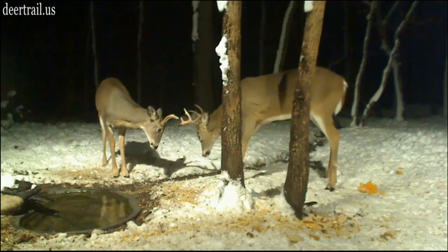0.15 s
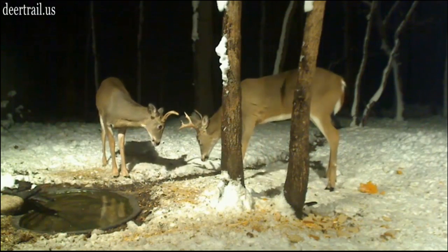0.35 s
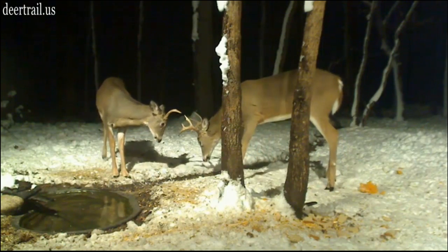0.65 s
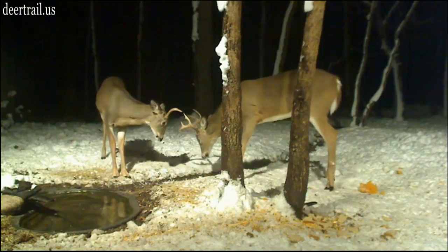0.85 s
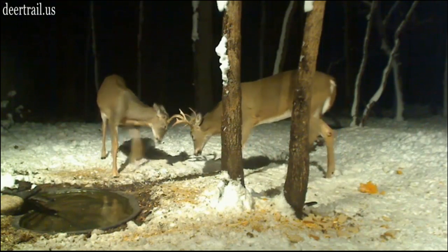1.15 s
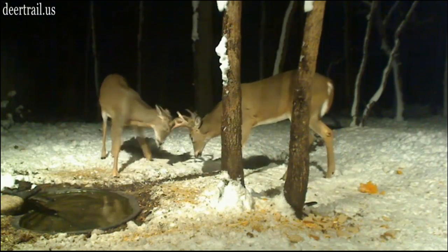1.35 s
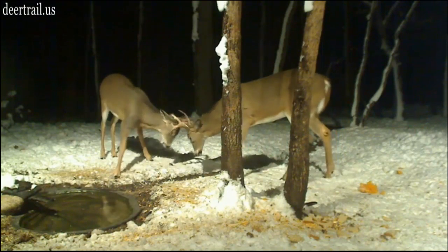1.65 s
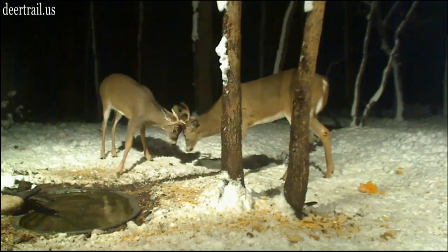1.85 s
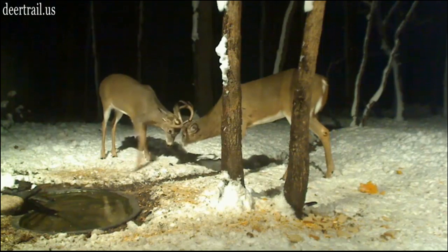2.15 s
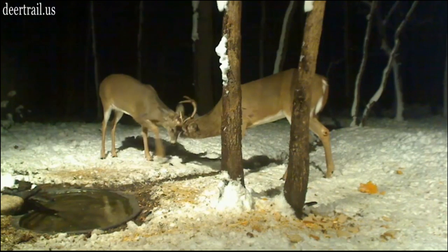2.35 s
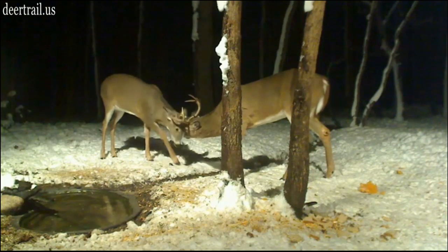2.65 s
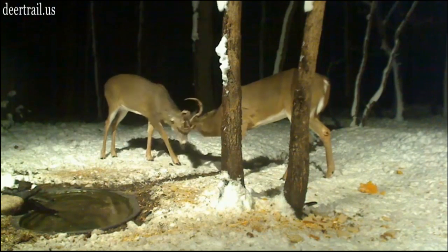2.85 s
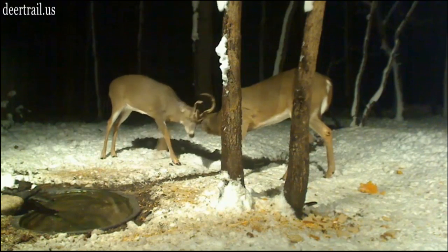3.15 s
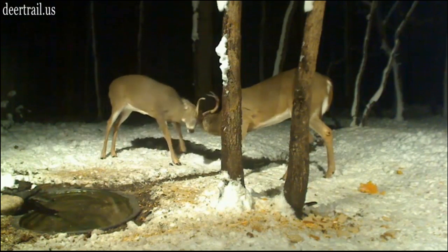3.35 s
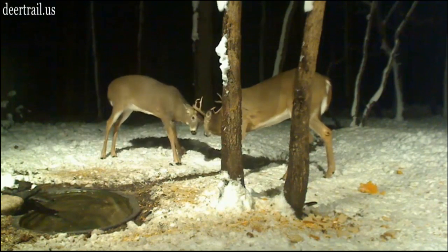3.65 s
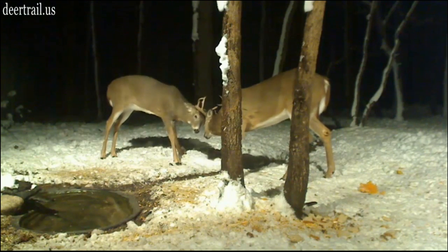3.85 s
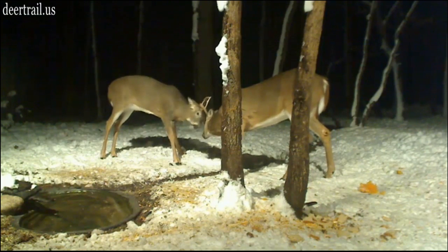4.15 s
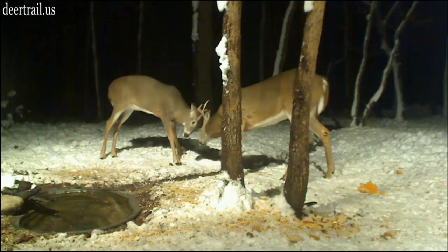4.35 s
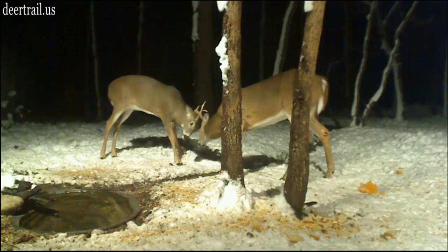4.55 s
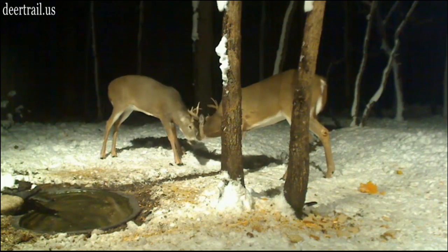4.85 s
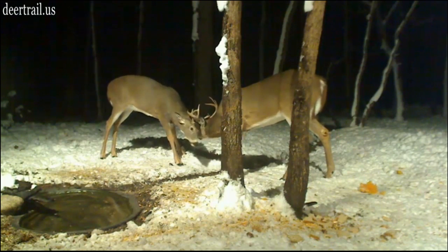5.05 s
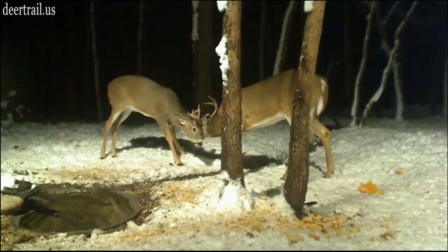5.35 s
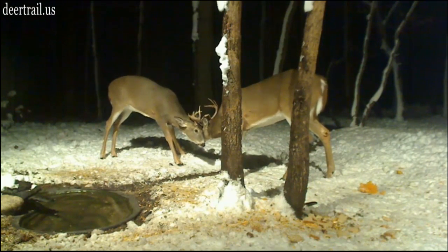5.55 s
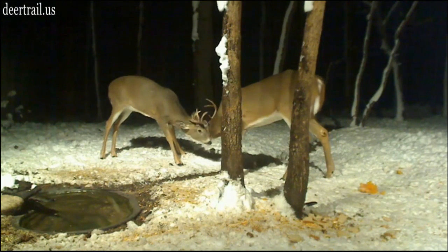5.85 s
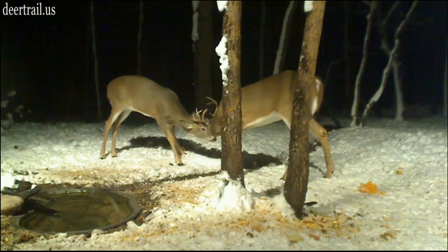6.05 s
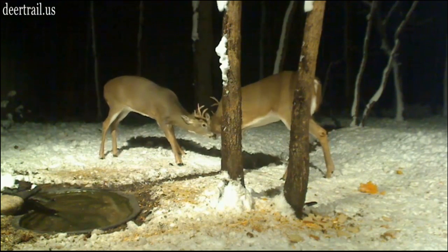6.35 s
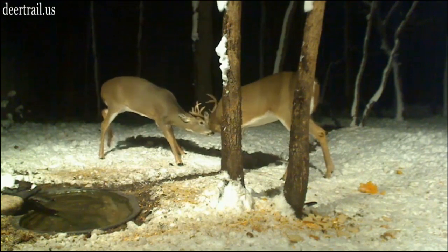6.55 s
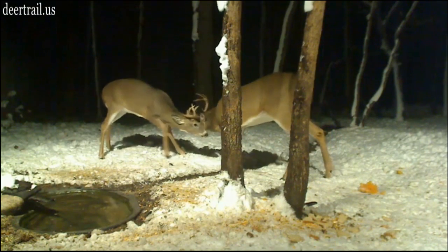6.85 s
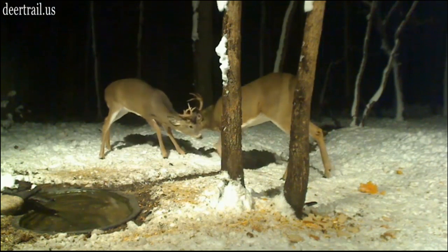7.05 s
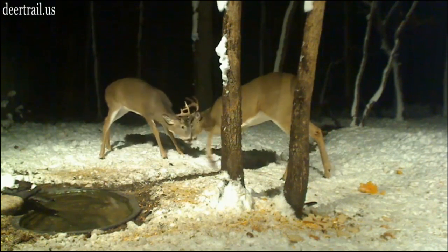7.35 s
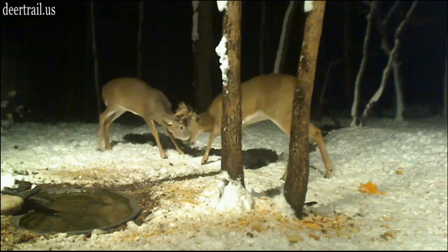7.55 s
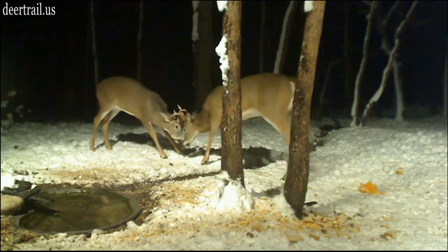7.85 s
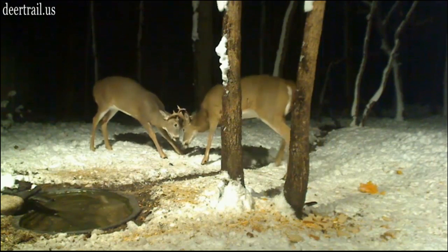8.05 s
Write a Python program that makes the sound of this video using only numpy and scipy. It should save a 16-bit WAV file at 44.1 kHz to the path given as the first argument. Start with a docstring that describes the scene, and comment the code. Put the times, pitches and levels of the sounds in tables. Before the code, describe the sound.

Two deer spar at a snowy woodland edge at night, heard from a few metres away. Small antler clicks and scrapes come early with soft powdery hoof rustles, then isolated hard clacks near the middle, a long near-quiet gap, and the loudest crack close to the end. Trees return a short, thin echo. A dull distant wash and faint low machine hum lie beneath.

```python
"""Two bucks spar on crusted snow at night, heard from some metres away at the edge of a wood.
Their antlers clack and grind as dying modes of skulls, beams and tines, struck by blows or runs of tiny slips.
Hooves thud as short sine pushes; snow sweeps and soft bursts of hiss are streams of tiny coloured clicks.
The wood adds a few echoes, a short dense scatter and a thin noise tail. Under it lie a dull distant wash of
shaped noise and the low hum of a far machine, made of two wavering tones."""
import sys
import numpy as np
from scipy import signal
from scipy.fft import rfft, irfft, next_fast_len
from scipy.io import wavfile
from scipy.ndimage import uniform_filter1d

SR = 44100
rng = np.random.default_rng(int(sys.argv[2]) if len(sys.argv) > 2 else 0)


def wrap_up_sound(samples):
    """Save the sound to the file named by the first command line argument, as 16-bit audio."""
    columns = np.atleast_2d(samples).T
    # keep every value between -1 and 1, then stretch to whole-number steps
    tamed = np.clip(columns, -1, 1)
    steps = np.round(tamed * 32767).astype(np.int16)
    wavfile.write(sys.argv[1], SR, steps)


N = 362061
TIME = np.arange(N) / SR  # s
RING = np.arange(6000) / SR  # time within one short sound, s

# Colour of the night air: freq_hz, level_db_per_hz
AIR_SPECTRUM = [(20, -8.5), (50, -5), (75, -2), (110, 2), (170, -7), (330, -4), (480, -4.5), (610, -1),
                (780, -5.5), (1050, -6), (1600, -21), (3000, -24), (7000, -29.5), (10000, -34)]
# Level of the distant wash: time_s, level_db
WASH_LEVEL = [(0, -58), (7.5, -58), (7.95, -54.5), (8.21, -56.5)]
# Soft bursts of bright hiss, most of them hooves sweeping through snow:
# start_s, length_s, level_db, icy_share (0 powder to 1 crust)
HISS_BURSTS = [(0, 0.037, -64, .4), (.411, 0.042, -63, .2), (.52, 0.37, -72.5, 0.22),
               (1.011, 0.14, -64.5, .15), (1.336, .15, -62, .25), (1.572, .026, -59, 0.12),
               (1.632, 0.022, -62, 0.2), (2.143, 0.12, -60, 0.76), (2.337, 0.13, -66.5, 0.73),
               (2.853, 0.017, -65.5, 0.6), (3.632, 0.036, -62, .6), (4.38, .1, -70, 0.2),
               (6.878, 0.15, -68, 0.7), (7.116, .053, -65, 0.55), (7.614, 0.045, -63, 0.9),
               (7.687, 0.036, -62, 0.7)]
# Colour of powder snow: freq_hz, level_db_per_hz
POWDER_SPECTRUM = [(300, -6), (1400, 3), (3000, -3.5), (4300, 2.5), (6000, -1.5), (7200, -9.5), (8100, -7),
                   (10300, -15)]
# Colour of icy crust: freq_hz, level_db_per_hz
CRUST_SPECTRUM = [(300, -16), (1500, -12), (3000, -8), (4300, 0.5), (6300, 0), (7200, 10.5), (8100, 0.5),
                  (9700, 5.5), (10600, -5)]
# Antlers grinding on each other: start_s, end_s, level_db
ANTLER_GRINDS = [(.56, .76, -60), (.828, .86, -51.5), (1.08, 1.1, -45), (1.11, 1.132, -47),
                 (1.412, 1.48, -49), (2.67, 2.745, -61), (3.08, 3.21, -57), (3.65, 3.705, -50.5),
                 (4.422, 4.47, -46.5), (6.942, 6.975, -51.5), (7.83, 7.90, -49.5)]
# Modes of each buck's head, skull to beams to tines, at pitch and length factors of 1:
# freq_hz, level_db, t60_s
LIGHT_RACK_MODES = [(135, 0, 0.079), (264, -10, 0.071), (339.4, 5, 0.04), (402.6, -18, 0.079),
                    (663, -9, 0.089), (1027, -7.5, 0.13), (1245, 6, 0.039), (1350, -7, 0.028),
                    (1807, -12, 0.064), (1984, -4, 0.027), (2597, -9.5, 0.041), (3000, -16, 0.011),
                    (3340, -12, 0.017), (3403, -9.5, 0.032), (3850, -7.5, 0.023), (4195, -2.5, 0.017),
                    (4890, -5.5, 0.018), (5690, -5.5, 0.01), (5884, -4.5, 0.019), (6270, -2.5, 0.018),
                    (6410, -5, 0.015), (6820, -3.5, 0.014), (7420, -7, 0.015)]
HEAVY_RACK_MODES = [(76, -19, 0.045), (154, -13, 0.027), (242, -13, 0.028), (337, -1, 0.035),
                    (399, -2.5, 0.051), (944, -10.5, 0.029), (1130, -13.5, 0.016), (1328, 3, 0.034),
                    (2160, -7, 0.033), (2507, -11.5, 0.04), (3180, -15, 0.035), (4310, -16, 0.027),
                    (4356, -15, 0.053), (4492, 1.5, 0.022), (4720, -6.5, 0.018), (5400, -17, 0.012),
                    (5700, -9, 0.016), (6880, -1, .01), (7230, -2, 0.015), (7460, -4.5, 0.014)]
# Hoof falls: start_s, peak_db (of the envelope), pitch_hz
HOOF_FALLS = [(.819, -37, 336), (1.0664, -32, 300), (1.684, -30.5, 415), (3.128, -43, 335),
              (3.658, -31, 175), (5.627, -42.5, 334), (5.844, -45.5, 340), (6.072, -43.5, 350),
              (6.4812, -26.5, 407), (7.092, -41.5, 265), (7.98, -44.5, 274)]
# Antler blows: start_s, force_db, contact_place (0 base to 1 tine tip), pitch_factor, heavy_share (0 to 1)
ANTLER_BLOWS = [(.82, -51, .37, 0.83, .7), (1.065, -53, .3, 1.02, .2), (1.1039, -42, .05, 0.85, .3),
                (1.137, -43, .42, 0.86, 0.09), (1.278, -48.5, 0.86, 0.96, 0.4),
                (1.3909, -44, 0.74, 0.91, 0.4), (1.403, -41.5, 0.95, 0.94, 0.1),
                (2.549, -45, 0.49, 1.01, 0.46), (3.155, -51.5, .17, 0.99, 0.04),
                (3.1852, -47, .08, .89, 0.4), (3.6002, -57.5, .85, 1.02, 0.25),
                (3.648, -40.5, .45, 0.79, 0.2), (3.657, -40.5, 0.5, .92, 0.96),
                (3.6648, -29.5, .35, .91, .6), (3.685, -43.5, .1, 1, .4), (3.695, -48, 0.76, .68, 0),
                (4.4024, -43.5, 0.44, .96, 0), (4.4404, -40, 0.48, 0.93, 0.08),
                (4.711, -49.5, .18, 1.07, 0.9), (5.101, -27, 0.92, 1, 0.08), (6.8883, -58.5, 0.36, 1.1, .8),
                (6.938, -49.5, .05, 0.83, 0), (6.996, -48.5, .43, 0.9, 0.5),
                (7.6363, -40.5, 0.4, .81, 0.43), (7.818, -21.5, 0.62, .99, 0.97),
                (7.861, -40, 1, 0.98, .77), (7.875, -36, 0.74, 0.91, 0.96), (7.914, -46.5, .3, 0.77, 0.3)]
# Splintery noise of a contact: freq_hz, level_db_per_hz
SPLINTER_SPECTRUM = [(300, -21), (1500, -3), (2400, -3.5), (3200, -0.5), (3700, -5), (4200, -13),
                     (5200, -2), (7400, -12.5), (7900, -15), (9200, -9), (10000, -44)]
# Discrete echoes off nearby trunks: delay_s, level_db
TRUNK_ECHOES = [(.0053, -17), (0.014, -17.5), (0.0165, -42), (0.0236, -20.5)]
# How much of each band the wood scatters back: freq_hz, level_db
SCATTER_SPECTRUM = [(150, 5), (400, -9.5), (1300, -2.5), (2200, 1.5), (4500, -1.5), (7200, -3), (8500, 1.5)]
# Dying time of the wood's tail: freq_hz, t60_s
WOODS_DECAY = [(200, 0.11), (1300, 0.37), (3500, 0.52), (7000, 0.45), (10000, 0.28)]

LOW_HUM_HZ, LOW_HUM_DB = 90.1, -66.5
HIGH_HUM_HZ, HIGH_HUM_DB, HUM_RISE_DB_PER_S = 134.3, -71.5, 1.24  # the upper tone slowly grows
THROB_DB, THROB_PERIOD_S, THROB_PEAK_S = 3.5, 1.837, 6.69  # swing either way, period, time of one peak
BURST_EDGE_S = 0.011  # each burst fades in and out this quickly
SETTLE_DB, SETTLE_S = -11.5, 0.088  # the patter after a burst: level against it, decay time constant
FIRM_DB = -39.5  # the force of an ordinary firm blow
THUMP_DB, THUMP_GROWTH = -41, 0.78  # skulls of a light rack under a firm blow; dB more per dB of force
HEAVY_THUMP_DB = -3.5  # the heavy head gives way less
BASE_CRACK_DB, TIP_CRACK_DB = -24, 5.5  # crack against beams, for a blow at the base and at the tip
EDGE_HZ = 10380  # upper band limit


def amp(db):
    """Turns decibels into gain."""
    return 10 ** (np.asarray(db) / 20)


def evened(x):
    """Scales to rms 1."""
    return x / np.sqrt(np.mean(x ** 2) + 1e-20)


def crested(x):
    """Scales so that the loudest two milliseconds have rms 1."""
    power = uniform_filter1d(x ** 2, size=88, mode="constant")
    return x / np.sqrt(power.max() + 1e-20)


def read(points, hz):
    """Reads a spectrum table on a log-frequency axis."""
    f, value = np.transpose(points)
    return np.interp(np.log(hz + 1), np.log(f + 1), value)


def curve(rows):
    """Draws a curve table at every sample."""
    return np.interp(TIME, *np.transpose(rows))


def coloured(x, points):
    """Filters x with the gains of a spectrum table."""
    size = next_fast_len(len(x) + 512)
    gain = amp(read(points, np.fft.rfftfreq(size, 1 / SR)))
    return irfft(rfft(x, size) * gain, size)[:len(x)]


def add(mix, s, sound):
    """Mixes a sound in at time s."""
    part = mix[max(round(s * SR), 0):][:len(sound)]
    part += sound[:len(part)]


def strokes(rows, edge):
    """Sums the levels of soft-edged strokes."""
    level = 0
    for start, end, db in rows:
        inside = np.minimum(TIME - start, end - TIME)
        level = level + amp(db) * np.clip(inside / edge + .5, 0, 1)
    return level


def grains(per_s, spread_db):
    """Scatters a random train of clicks of uneven size."""
    hits = rng.random(N) < per_s / SR
    size_db = spread_db * np.minimum(rng.exponential(1, N), 3)
    return hits * rng.choice([-1, 1], N) * amp(size_db)


def air():
    """A dull distant wash of noise that swells a little near the end, with steady hiss above it."""
    wash = evened(coloured(rng.standard_normal(N), AIR_SPECTRUM))
    low = signal.sosfiltfilt(signal.butter(2, 1500, fs=SR, output="sos"), wash)
    hiss = wash - low
    level_db = curve(WASH_LEVEL)
    return amp(level_db) * low + amp(level_db.mean()) * hiss


def wavering_tone(hz, db, waver_hz):
    """A sine whose pitch drifts at random."""
    knots = np.linspace(0, N / SR, num=60)
    drift = np.interp(TIME, knots, rng.standard_normal(len(knots)))
    phase = 2 * np.pi * np.cumsum(hz + waver_hz * drift) / SR
    return np.sqrt(2) * amp(db) * np.sin(phase)


def hum():
    """Two wavering tones of a far machine: the lower is level, the upper throbs slowly and grows."""
    throb_db = THROB_DB * np.cos(2 * np.pi * (TIME - THROB_PEAK_S) / THROB_PERIOD_S)
    upper_db = HIGH_HUM_DB + HUM_RISE_DB_PER_S * TIME + throb_db
    lower = wavering_tone(LOW_HUM_HZ, LOW_HUM_DB, waver_hz=2.19)
    upper = wavering_tone(HIGH_HUM_HZ, upper_db, waver_hz=0.93)
    return lower + upper


def snow_texture(level, spectrum):
    """Tiny dense clicks, coloured as one kind of snow and shaped by its level."""
    return level * evened(coloured(grains(per_s=7000, spread_db=6.0), spectrum))


def snow():
    """Soft bursts of powdery hiss and brighter icy crunch, each with a patter that settles after it."""
    powder, crust = np.zeros((2, N))
    for start, length, db, icy in HISS_BURSTS:
        since = TIME - start - length
        settling = amp(db + SETTLE_DB) * (since > 0) * np.exp(-abs(since) / SETTLE_S)
        burst = strokes([(start, start + length, db)], edge=BURST_EDGE_S)
        level = np.maximum(burst, settling)
        icy = np.clip(icy, 0, 1)
        powder += np.sqrt(1 - icy) * level
        crust += np.sqrt(icy) * level
    return snow_texture(powder, POWDER_SPECTRUM) + snow_texture(crust, CRUST_SPECTRUM)


def ring(modes, pitch=1, length=1):
    """Dying modes; bending waves travel slower when low, so low modes arrive later."""
    hz, db, t60 = np.transpose(modes)[:, :, None]
    t = np.maximum(RING - .0014 * np.sqrt(1e3 / hz), 0)  # time since each mode arrived
    rise = 1 - np.exp(-hz * t)
    fall_db = 60 * t / (t60 * length)
    return amp(db - fall_db) * np.sin(2 * np.pi * hz * pitch * t) * rise


def racks(heavy, pitch, length=1):
    """Both heads ringing together, in three parts by frequency: skulls, beams and tines."""
    modes = LIGHT_RACK_MODES + HEAVY_RACK_MODES
    heavy = np.clip(heavy, 0, 1)
    weight = np.sqrt([1 - heavy] * len(LIGHT_RACK_MODES) + [heavy] * len(HEAVY_RACK_MODES))
    ringing = weight[:, None] * ring(modes, pitch, length)
    part = np.digitize(np.transpose(modes)[0], [850, 3050])  # Hz borders between the parts
    return [crested(ringing[part == k].sum(0)) for k in range(3)]


def grinding():
    """Ridged antlers stick and slip: tiny blunt blows into the same modes, damped by the pressure."""
    skulls, beams, tines = racks(heavy=0.83, pitch=0.883, length=0.72)
    blunt_beams = coloured(beams, [(1400, -4), (2100, -1.5)])
    body = blunt_beams + amp(-18.5) * tines + amp(4.5) * skulls
    slips = evened(grains(per_s=620, spread_db=4.0)) * strokes(ANTLER_GRINDS, edge=.007)
    return signal.oaconvolve(slips, body / np.linalg.norm(body))[:N]


def hooves():
    """A hoof on frozen ground: a soft push of hardly two cycles."""
    out = np.zeros(N)
    for s, db, hz in HOOF_FALLS:
        cycles = RING * hz
        swell = cycles ** 2 * np.exp(-cycles / 0.27)
        add(out, s, -amp(db) * swell / swell.max() * np.sin(2 * np.pi * cycles))
    return out


def blows():
    """Each blow cracks the tines, rings the beams and thumps the skulls; nearer the tips, more crack."""
    out = np.zeros(N)
    contact = (1 - np.exp(-RING / .0007)) ** 2 * np.exp(-RING / .0035)
    for s, force_db, tip, pitch, heavy in ANTLER_BLOWS:
        thump_db = THUMP_DB + THUMP_GROWTH * (force_db - FIRM_DB) + HEAVY_THUMP_DB * heavy
        crack_db = force_db + BASE_CRACK_DB * (1 - tip) + TIP_CRACK_DB * tip
        # hard blows spring apart and ring freely
        length = np.interp(force_db, [-45, -25], [.75, .95])
        skulls, beams, tines = racks(heavy, pitch, length)
        splinter = crested(coloured(rng.standard_normal(len(RING)) * contact, SPLINTER_SPECTRUM))
        crack = tines + amp(-4.5 - 11.6 * heavy) * splinter  # thin tines splinter more
        # a blunt blow loses the top of each part; a negative value brightens it
        blunt_db = np.clip(force_db - crack_db - 1.0, -2, 11)
        beams = crested(coloured(beams, [(1400, 0), (2100, -.63 * blunt_db)]))
        crack = crested(coloured(crack, [(4200, 0.0032), (7000, -.51 * blunt_db)]))
        add(out, s, amp(force_db) * beams + amp(crack_db) * crack + amp(thump_db) * skulls)
    return out


def blurred(x, width_hz):
    """A randomly wandering phase widens every tone in x into a band of noise."""
    wander = np.cumsum(rng.standard_normal(N)) * np.sqrt(2 * np.pi * width_hz / SR)
    turning = signal.hilbert(x, next_fast_len(N))[:N] * np.exp(1j * wander)
    return turning.real


def woods(x):
    """A few discrete echoes, a short dense scatter and a long thin toneless tail, overlapping from the start."""
    near = x.copy()
    for delay, db in TRUNK_ECHOES:
        add(near, delay, amp(db) * x)
    scatter = rng.standard_normal(len(RING)) * np.exp(-RING / 0.021) * (1 - np.exp(-RING / 0.0036))
    # the tail is noise in which each band dies at its own pace
    hz, t, z = signal.stft(rng.standard_normal(SR), SR, nperseg=256)
    decay = amp(-60 * t / read(WOODS_DECAY, hz)[:, None])
    onset = 1 - np.exp(-t / 0.0031)
    tail = signal.istft(z * decay * onset, SR, nperseg=256)[1]
    tinted = coloured(x, SCATTER_SPECTRUM)
    toneless = coloured(blurred(x, width_hz=500), SCATTER_SPECTRUM)
    dense = signal.fftconvolve(tinted, scatter / np.linalg.norm(scatter))[:N]
    thin = signal.fftconvolve(toneless, tail / np.linalg.norm(tail))[:N]
    return near + amp(-8.5) * dense + amp(-15.5) * thin


def scene():
    """All is mixed to the middle; the clacks add a faint bright side signal, opposite in the two channels."""
    clacks = blows()
    fight = clacks + grinding() + hooves() + snow()
    mid = woods(fight) + air() + hum()
    side = amp(-22) * np.diff(clacks, prepend=0)  # differencing favours the treble
    return np.array([mid - side, mid + side])


def record(dry):
    """The upper band limit, a steep linear-phase lowpass."""
    lowpass = signal.firwin(511, EDGE_HZ, window=("kaiser", 9), fs=SR)
    return signal.oaconvolve(dry, lowpass[None], "same")


dry = scene()
out = record(dry)
wrap_up_sound(out)
```